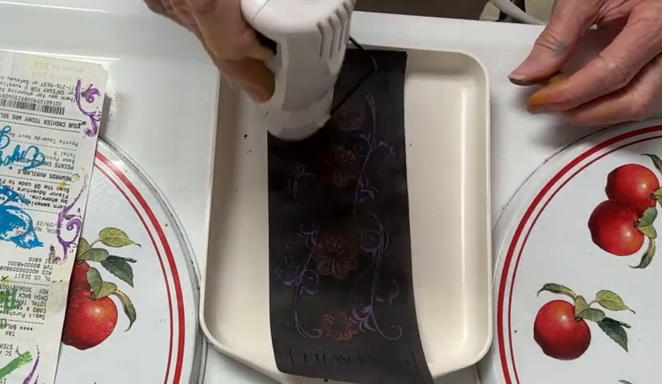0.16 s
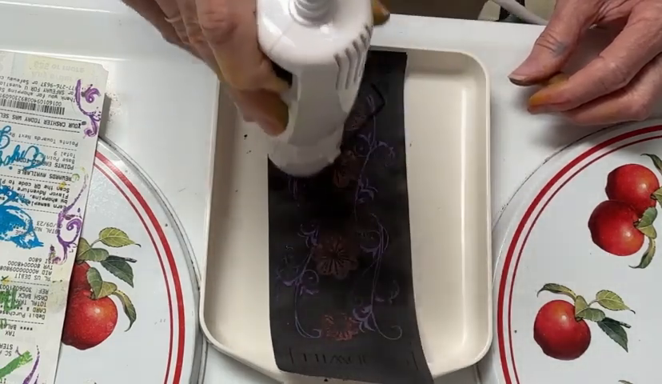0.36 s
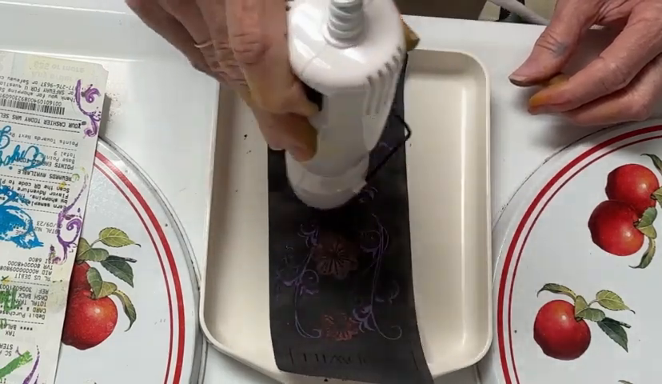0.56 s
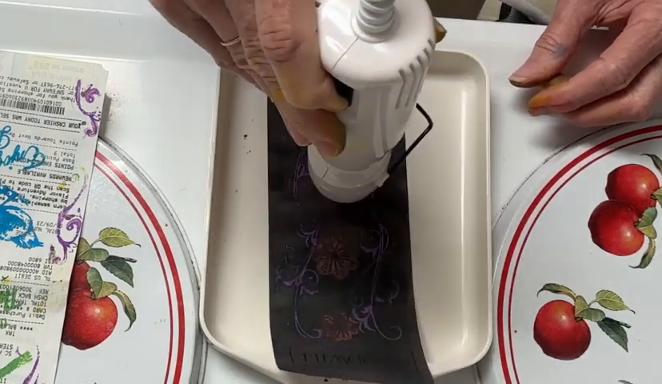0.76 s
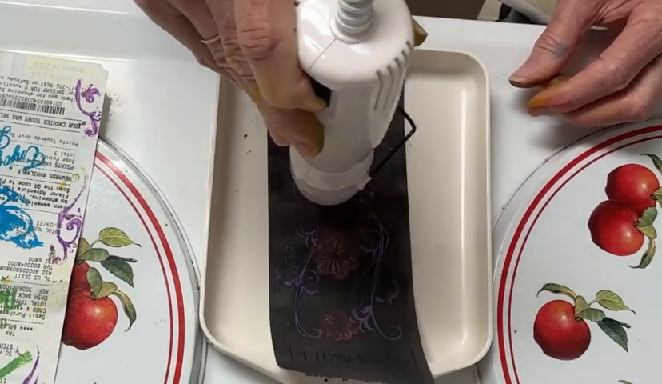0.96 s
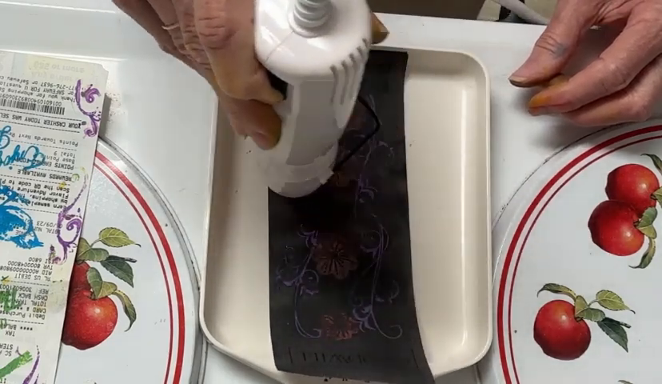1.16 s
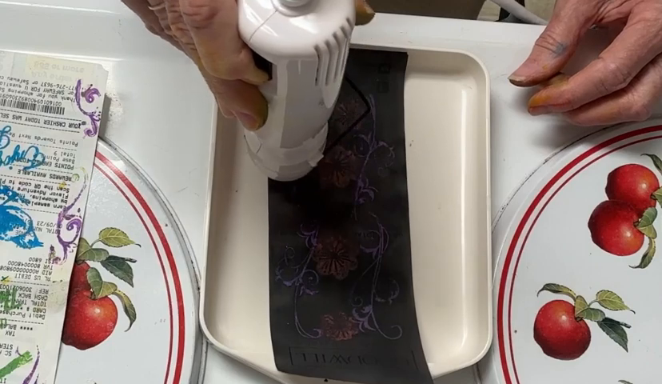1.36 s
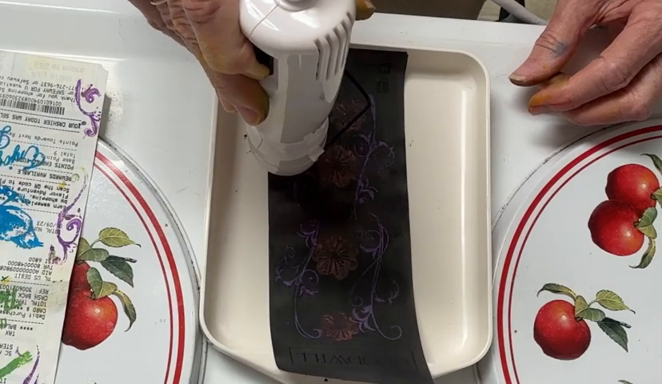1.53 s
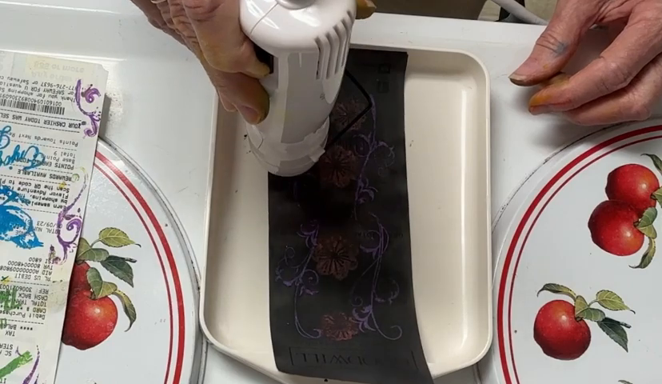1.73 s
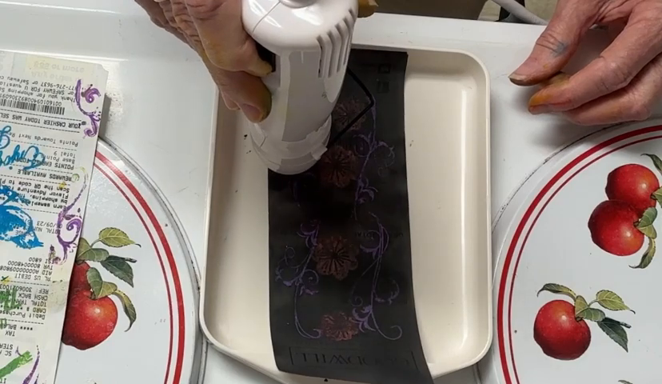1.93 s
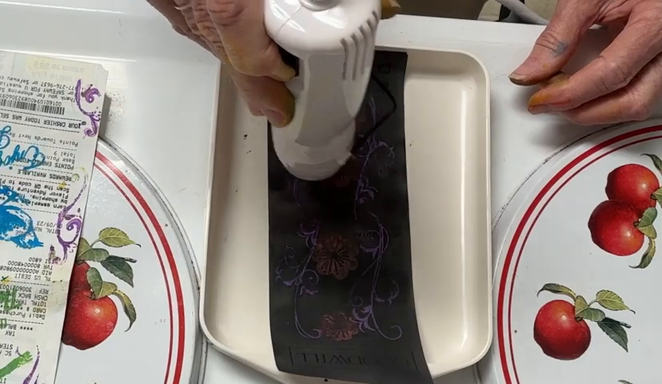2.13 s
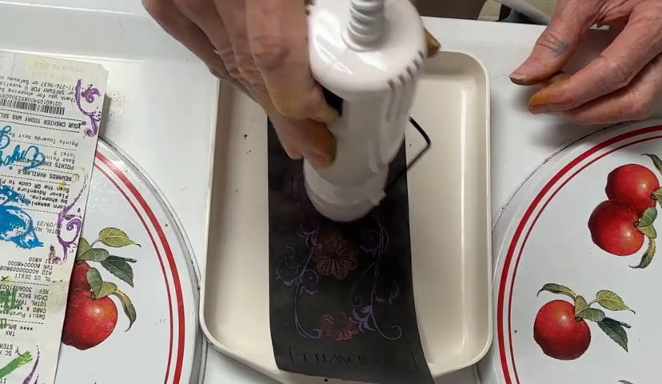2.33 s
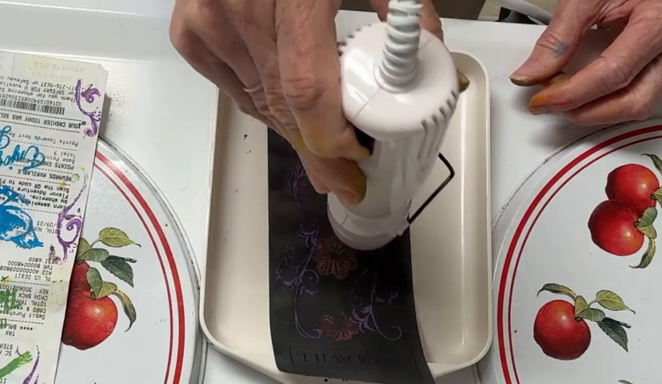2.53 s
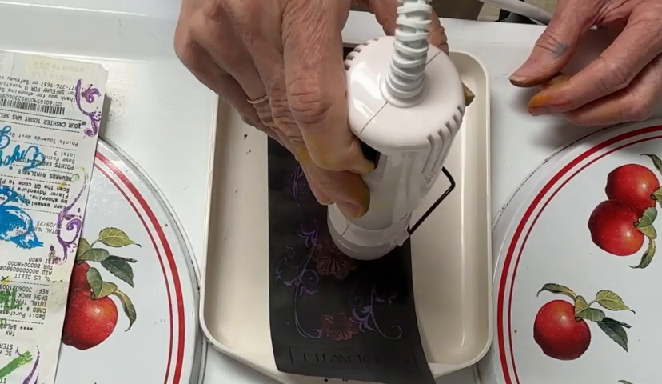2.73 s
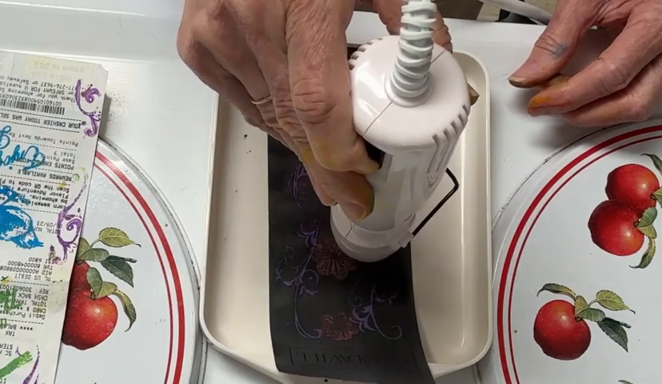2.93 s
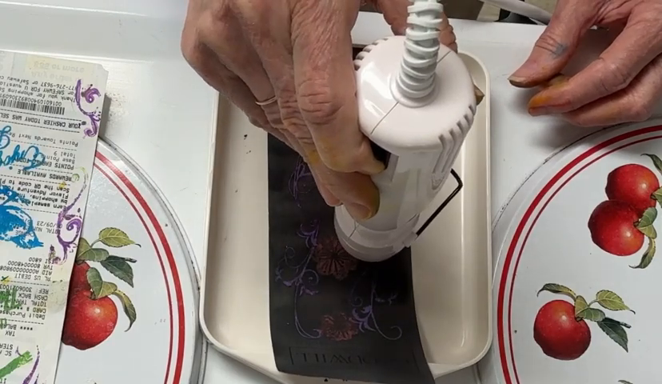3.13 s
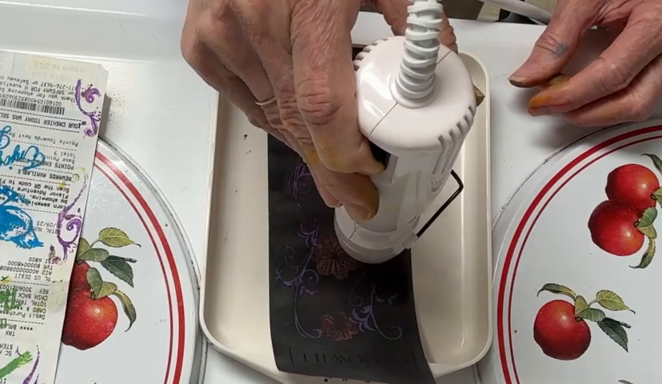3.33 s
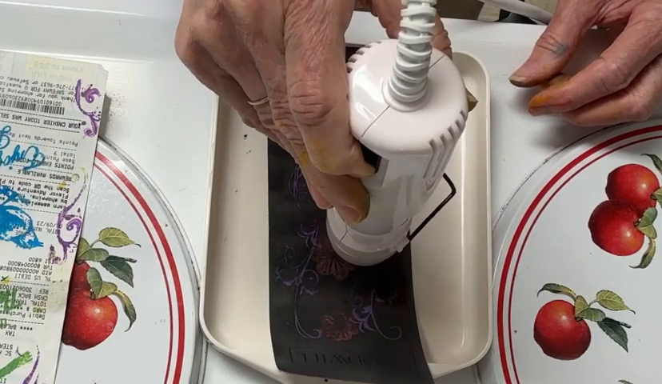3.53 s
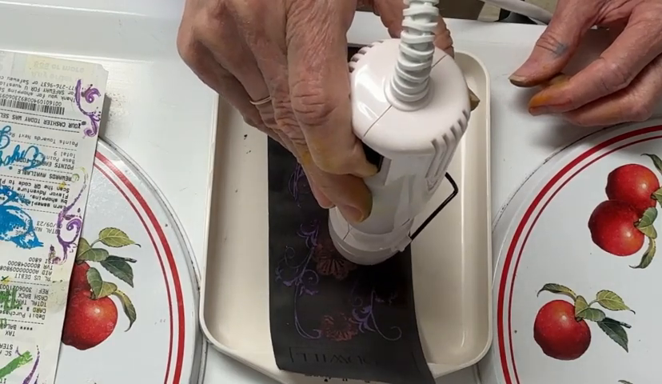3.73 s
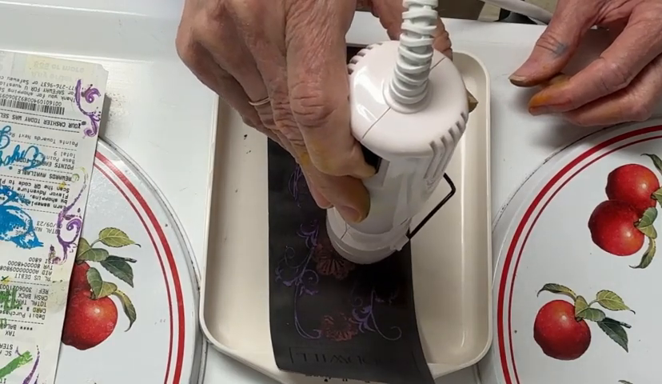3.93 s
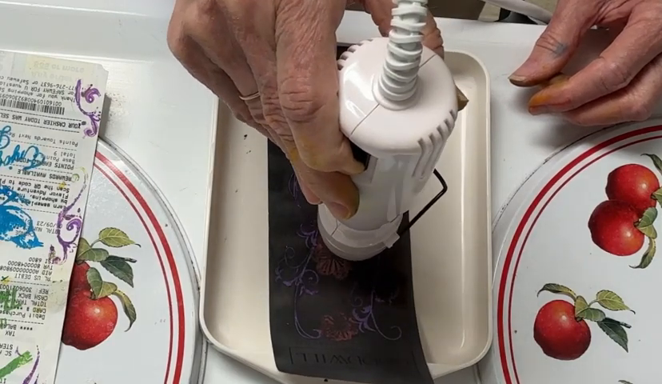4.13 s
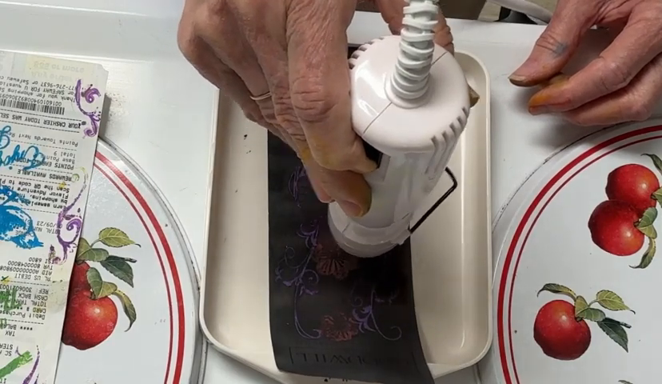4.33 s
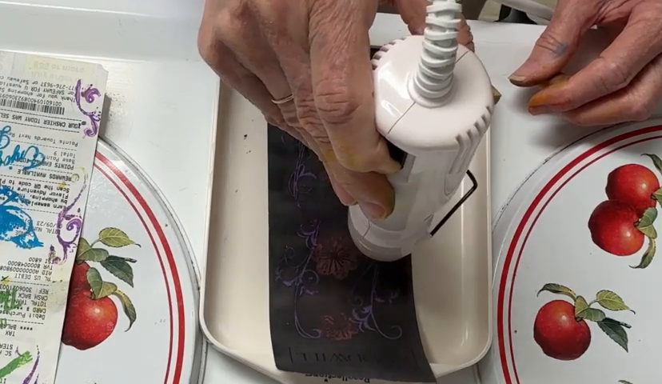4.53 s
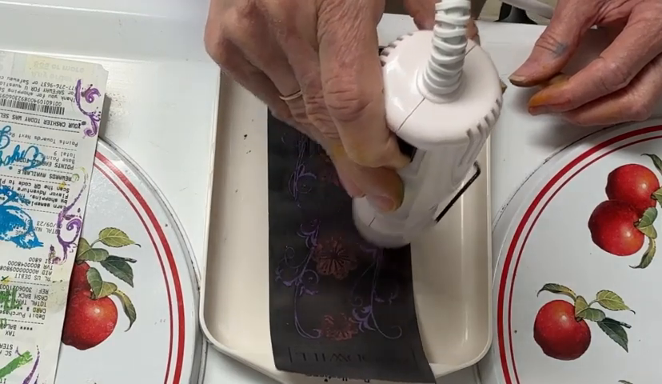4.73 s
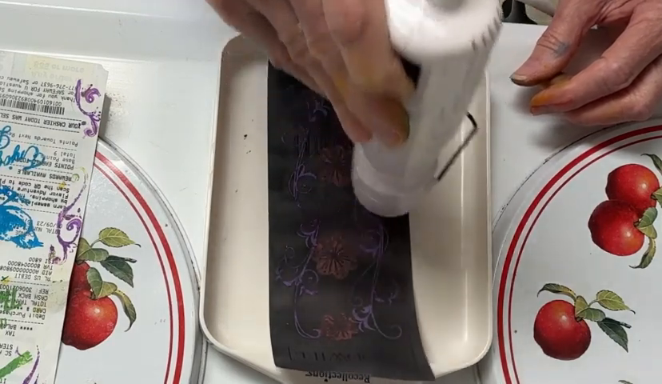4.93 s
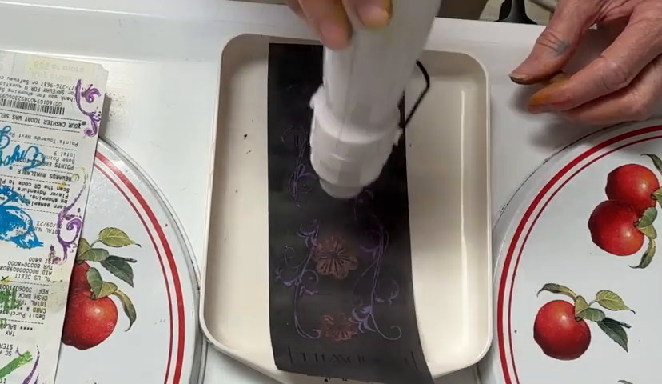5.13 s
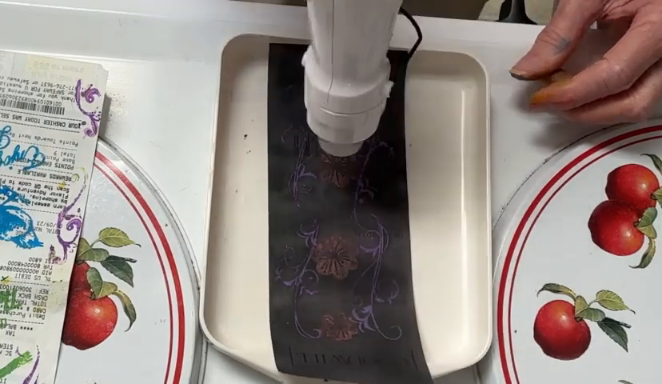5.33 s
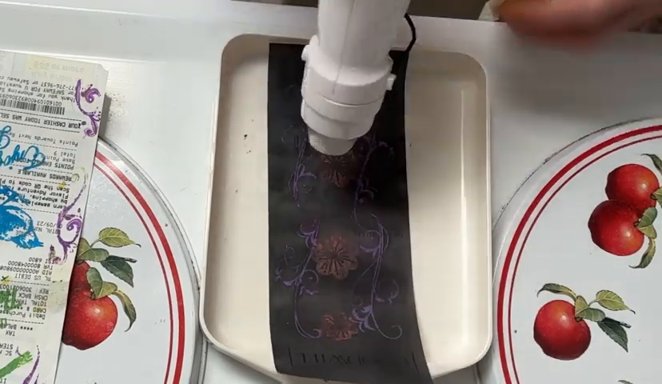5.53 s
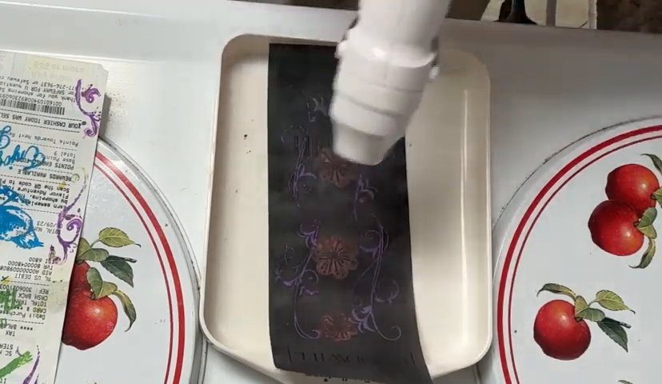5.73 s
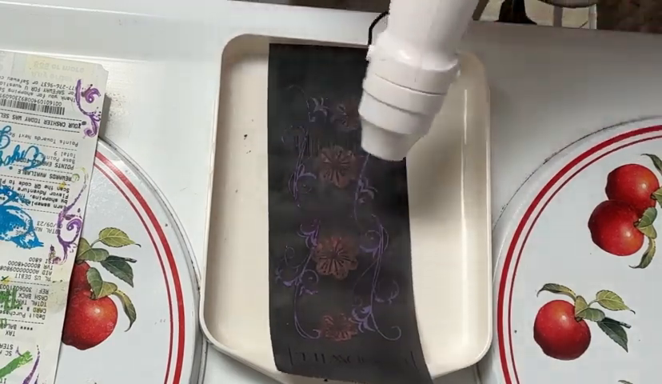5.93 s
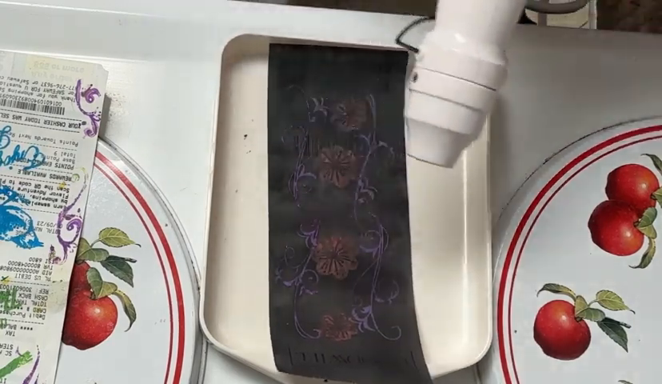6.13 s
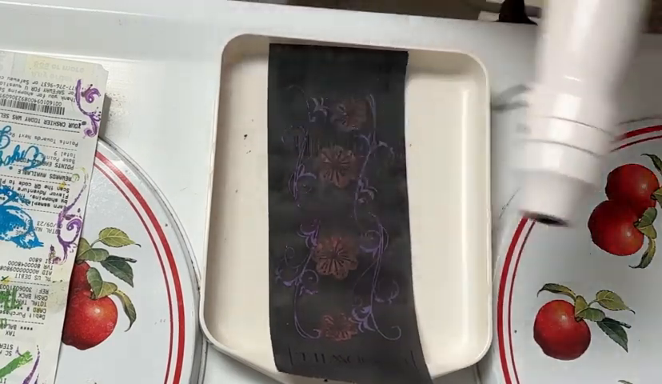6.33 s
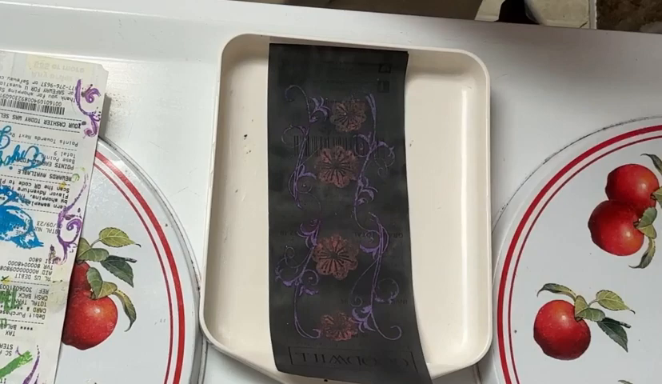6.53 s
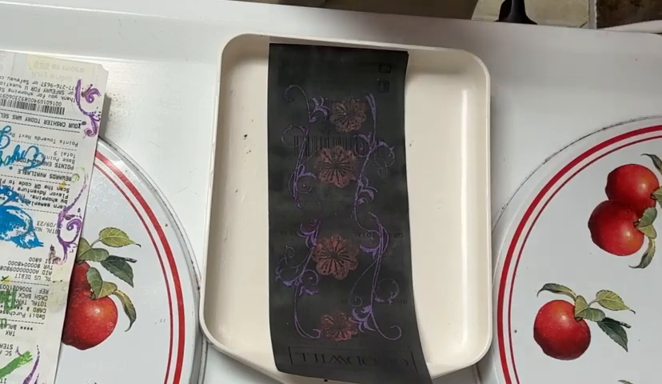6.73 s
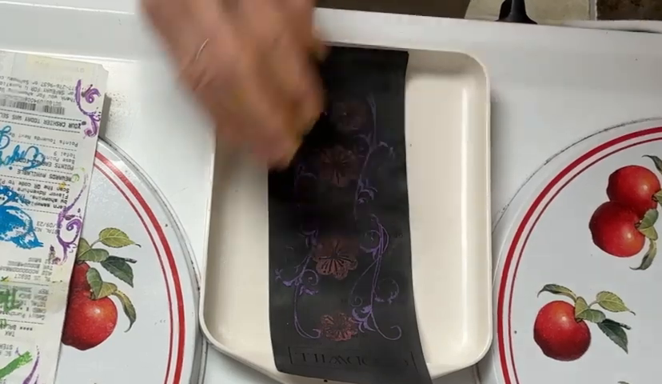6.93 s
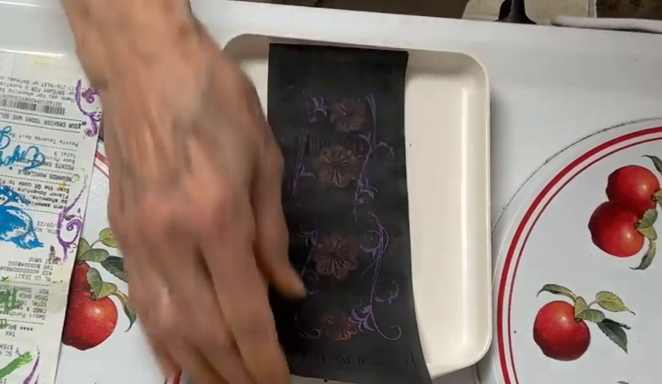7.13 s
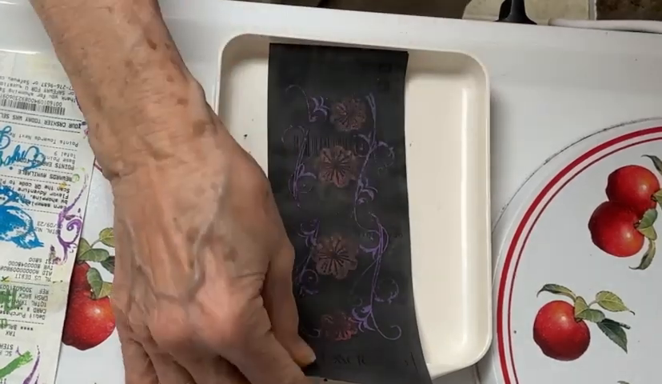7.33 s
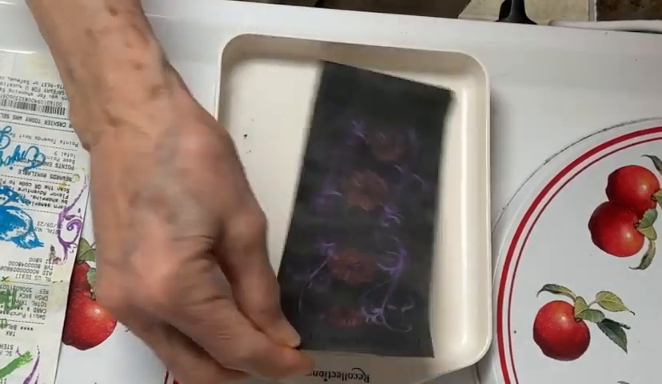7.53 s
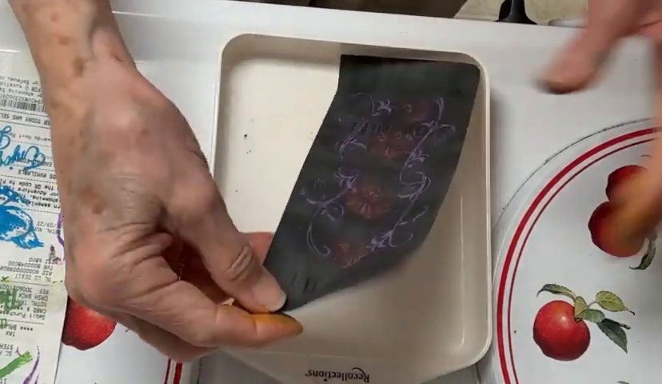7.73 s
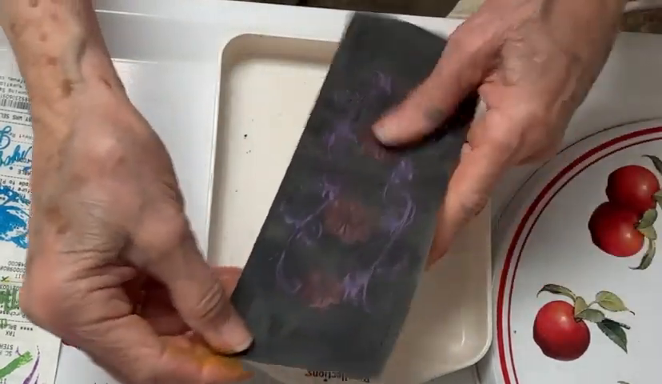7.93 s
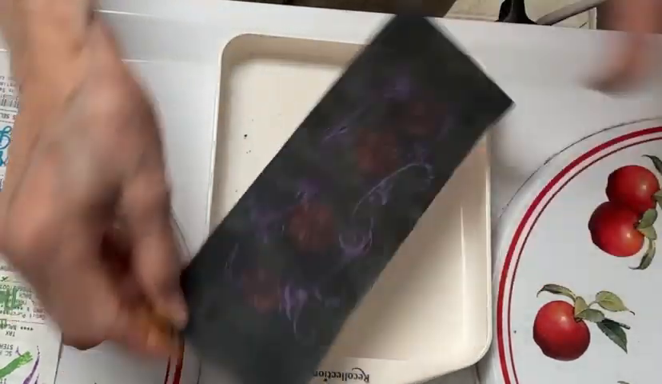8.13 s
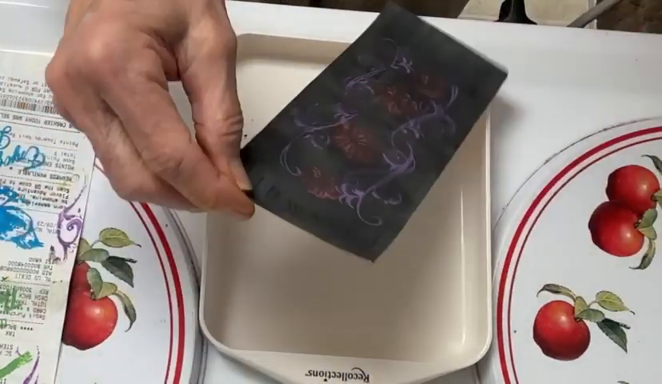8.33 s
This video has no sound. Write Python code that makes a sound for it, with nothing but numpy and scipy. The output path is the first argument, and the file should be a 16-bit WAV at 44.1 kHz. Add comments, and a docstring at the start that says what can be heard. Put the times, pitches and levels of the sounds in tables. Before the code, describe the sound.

Close, constant hot-air hiss and thin motor whine run, then coast down rattling; the tool is set down with knocks and stiff paper is lifted.

```python
"""A small heat gun blows over a strip of paper in a tray, close to the microphone: blade tone and shaft
orders over turbulent hiss coloured by duct resonances, which change as the gun is tipped and lifted.
Switched off, the fan coasts down against air drag while its loose shaft taps the bearing.
Dry ticks (noise snaps) and the wire stand's clink (damped sines) follow; the gun is put down on the
table (modal noise thuds), then paper rubs (noise grains), springs, ticks and is lifted off the ringing tray."""
import sys
import numpy as np
from scipy import signal
from scipy.fft import rfft, irfft
from scipy.io import wavfile
from scipy.ndimage import uniform_filter1d

SR = 44100
rng = np.random.default_rng(int(sys.argv[2]) if len(sys.argv) > 2 else 0)


def digitize_waveform(pressure):
    """Quantize a signal to 16-bit integers and store it at the path in sys.argv[1].

    Rows of a 2-D input are taken as channels; values are limited to [-1, 1].
    """
    field = np.atleast_2d(pressure).T
    bounded = np.clip(field, -1, 1)
    quanta = np.round(bounded * 32767).astype(np.int16)
    wavfile.write(sys.argv[1], SR, quanta)


N = 373968
T = np.arange(N) / SR


def amp(db):
    """Level law: decibels to an amplitude ratio."""
    return 10 ** (np.asarray(db) / 20)


def unit(x):
    """Normalisation: scales to rms 1."""
    return x / np.sqrt(np.mean(abs(x) ** 2) + 1e-20)


def read(points, hz):
    """Spectral interpolation: reads a curve on a log-frequency axis."""
    f, value = np.transpose(points)
    return np.interp(np.log(hz + 1), np.log(f + 1), value)


def bump(hz, centre, width):
    """Resonance: a Gaussian bell of height 1, its width the standard deviation."""
    return np.exp(-.5 * ((hz - centre) / width) ** 2)


def above(hz, corner_hz):
    """Shelving: a weight that goes from 0 to 1 around the corner."""
    return hz ** 2 / (hz ** 2 + corner_hz ** 2)


def placed(events):
    """Superposition: sums (start_s, sound) pairs on one track, cut at its end."""
    track = np.zeros(N)
    for start_s, sound in events:
        part = track[round(start_s * SR):][:len(sound)]
        part += sound[:len(part)]
    return track


def drift(rate_hz):
    """Random modulation: low-passed noise of rms 1, its bandwidth set by the rate."""
    control_rate, count = 400, 4096
    hz = np.fft.rfftfreq(count, 1 / control_rate)
    slow = irfft(rfft(rng.standard_normal(count)) * bump(hz, 0, rate_hz))
    return unit(np.interp(T, np.arange(count) / control_rate, slow))


def coloured(x, db_at):
    """Linear filtering: shapes x by a spectrum in dB, then scales to rms 1."""
    gain = amp(db_at(np.fft.rfftfreq(len(x), 1 / SR)))
    return unit(irfft(rfft(x) * gain, len(x)))


def ring(modes, rise_s=0.00068):
    """Modal decay: a struck object sounds as a sum of damped sines, here for one second."""
    t = np.arange(SR) / SR
    partials = sum(amp(db - 60 * t / t60) * np.sin(2 * np.pi * (hz * t + rng.random()))
                   for hz, db, t60 in modes)
    return partials * (1 - np.exp(-t / rise_s))


def reflected(sound, wet=0.69, t60=0.21, echoes_per_s=2000):
    """Reflection: nearby surfaces throw a ringing sound back, so that its partials beat and swell."""
    t = np.arange(SR // 4) / SR
    arrivals = rng.random(len(t)) < echoes_per_s / SR
    echoes = rng.standard_normal(len(t)) * arrivals * amp(-60 * t / t60)
    returned = signal.oaconvolve(sound, echoes / np.linalg.norm(echoes))[:len(sound)]
    return (sound + wet * returned) / np.hypot(1, wet)


# Spectrum of the background hush, relative: pitch_hz [Hz], level_db [dB]
HUSH_SPECTRUM = [(20, -30), (45, -1.5), (75, 0), (115, -1.5), (165, -12), (280, -16.5), (520, -24.5),
                 (1200, -20.5), (2500, -28), (5000, -31), (10000, -34), (15500, -36)]
HUSH_DB = -60
HUM_HZ, HUM_DB = 74.4, -67


def room():
    """Stationary noise: a low hush, with a hum whose phase wavers."""
    hush = coloured(rng.standard_normal(N), lambda hz: read(HUSH_SPECTRUM, hz))
    hum = unit(np.sin(2 * np.pi * HUM_HZ * T + 0.82 * drift(3)))
    return amp(HUSH_DB) * hush + amp(HUM_DB) * hum


# Spectrum of the rubbing and of the dry ticks, relative: pitch_hz [Hz], level_db [dB]
DRY_SPECTRUM = [(60, -14), (130, -4), (250, -8.5), (450, -9), (900, -1.5), (1700, 0.5), (3200, -1),
                (4200, -3), (5400, -4), (7000, -8), (9500, -10.5), (15500, -23)]
# Strokes of hands and paper over table and tray, before slide's overall gain:
# start_s [s], length_s [s], level_db [dB]
STROKES = [(6.15, .04, -73), (6.55, 0.57, -63), (7.31, .11, -62.5), (7.517, .22, -56), (7.797, 0.27, -49.5),
           (8.168, .14, -46), (8.41, .07, -59.5)]
STROKE_ATTACK_S, STROKE_RELEASE_T60 = 0.029, 0.27  # both in s


def slide(gain_db=-1, grains_per_s=1100, smooth=0.15, catch_db=2, grain_spread_db=3):
    """Stick-slip friction: fibres catch in grains of uneven size as each stroke swells, holds and dies."""
    uneven_db = grain_spread_db * np.minimum(rng.exponential(1, N), 5)
    sizes = rng.choice([-1, 1], N) * amp(uneven_db)
    grains = sizes * (rng.random(N) < grains_per_s / SR) + smooth * rng.standard_normal(N)
    pressure = np.zeros(N)
    for start_s, length_s, level_db in STROKES:
        attack = np.clip((T - start_s) / STROKE_ATTACK_S, 0, 1)
        release_s = np.maximum(T - start_s - length_s, 0)
        pressure += attack * amp(level_db - 60 * release_s / STROKE_RELEASE_T60)
    rubbing = coloured(grains, lambda hz: read(DRY_SPECTRUM, hz))
    return amp(gain_db) * rubbing * pressure * amp(catch_db * drift(31))


# Partials of the stiff paper, before SHEET_DB: pitch_hz [Hz], level_db [dB], t60_s [s]
SHEET_PARTIALS = [(410, 3, 1), (455, -16, .6)]
SHEET_S, SHEET_DB = 7.6655, -57.5


def sheet():
    """Free vibration: the stiff paper hums when it springs."""
    return placed([(SHEET_S, amp(SHEET_DB) * ring(SHEET_PARTIALS))])


def tick(level_db, treble_db, snap_t60=0.034, tail_t60=0.31, tail_db=-14, treble_hz=5000, uneven_db=2.0):
    """Impulsive excitation: a short snap with resonances of its own and a faint tail from the room."""
    t = np.arange(SR // 4) / SR
    knots = np.column_stack([np.geomspace(300, 16000, 40), uneven_db * rng.standard_normal(40)])

    def colour(hz):
        return read(DRY_SPECTRUM, hz) + read(knots, hz) + treble_db * above(hz, treble_hz)
    snap = coloured(rng.standard_normal(len(t)), colour)
    return amp(level_db) * snap * (amp(-60 * t / snap_t60) + amp(tail_db - 60 * t / tail_t60))


# Dry ticks: the gun's shell, the stand's clink, the paper, and the sharp start of a blow on the tray:
# start_s [s], level_db [dB], treble_db [dB]
TICKS = [(5.876, -38, 1), (5.880, -37, 6), (6.373, -55, -28), (6.416, -39, -20), (6.622, -41.5, -14),
         (7.3367, -50.5, -7), (7.491, -47, -10), (7.5482, -46.5, 0), (7.575, -42.5, -5), (7.6656, -35, 1),
         (7.7607, -37.5, 7), (7.7727, -35, -4), (7.8201, -39.5, 4), (7.886, -39, 4), (7.8992, -38, -2),
         (7.915, -36, -7), (7.9708, -42, -8), (8.2334, -29, -16)]


def ticks():
    """Superposition of impulses: every dry tick at its own time."""
    return placed((start_s, tick(*snap)) for start_s, *snap in TICKS)


# Partials of the tray, before TRAY_DB: pitch_hz [Hz], level_db [dB], t60_s [s]
TRAY_PARTIALS = [(569, -3, 1.2), (1180, -0.5, 0.75), (1850, -3, 1.3), (2960, -10, 1.4), (3015, -6, .8)]
TRAY_S, TRAY_DB = 8.2335, -47


def tray():
    """Modal decay: the struck tray sings on."""
    return placed([(TRAY_S, amp(TRAY_DB) * ring(TRAY_PARTIALS))])


# Spectrum of a struck table, relative: pitch_hz [Hz], level_db [dB]
TABLE_SPECTRUM = [(35, -15), (80, -0.5), (140, 3.5), (230, -1), (450, -7.5), (800, -3), (1400, -4.5),
                  (2200, -7.5), (3400, -10), (6000, -13.5), (10000, -18), (15500, -28)]
# Resonances of the table, added to that spectrum: pitch_hz [Hz], width_hz [Hz], level_db [dB]
TABLE_MODES = [(120, 16, 3.5), (150, 21, 4), (223, 16, 2), (376, 23, 10.5), (546, 22, 1.5), (722, 50, 6),
               (910, 42, 1.7), (1070, 30, 0), (1204, 35, 5), (1430, 60, 0), (3370, 120, 0)]
# Damping of the table: pitch_hz [Hz], ring_factor [ratio applied to a contact's t60]
TABLE_DAMPING = [(100, 1.2), (1000, 1.13), (3000, 0.98), (12000, 0.77)]


def knock(level_db, bass_db, treble_db, t60, rise_s, bass_hz=260, treble_hz=2800, bass_lag_s=0.0023):
    """Modal density: a blow rings the table's crowded modes; the bass swells last and dies last."""
    def colour(hz):
        modes_db = sum(db * bump(hz, f, w) for f, w, db in TABLE_MODES)
        tilt_db = bass_db * (1 - above(hz, bass_hz)) + treble_db * above(hz, treble_hz)
        return read(TABLE_SPECTRUM, hz) + modes_db + tilt_db
    body = coloured(rng.standard_normal(SR), colour)
    hz, t, z = signal.stft(body, SR, nperseg=256)
    hz = hz[:, None]
    swell = 1 - (1 - above(hz, bass_hz)) * np.exp(-t / bass_lag_s)
    decay = amp(-60 * t / (t60 * read(TABLE_DAMPING, hz)))
    body = signal.istft(z * swell * decay, SR, nperseg=256)[1][:SR]
    return amp(level_db) * body * (1 - np.exp(-np.arange(SR) / SR / rise_s))


# After the first contact the weight settles: later, deeper, duller, and ringing longer (factor on t60)
SETTLE_S, SETTLE_BASS_DB, SETTLE_TREBLE_DB, SETTLE_RING = .01, 6.5, -14.5, 1.44
RISE_S = .0015  # of a contact with neutral bass


def blow(level_db, bass_db, treble_db, t60, settle_db, heavy=.8):
    """Contact mechanics: a first contact, then the weight settling; heavier contacts rise more slowly."""
    def contact(level_db, bass_db, treble_db, t60):
        return knock(level_db, bass_db, treble_db, t60, RISE_S * amp(heavy * bass_db))
    first = contact(level_db, bass_db, treble_db, t60)
    settling = contact(level_db + settle_db, bass_db + SETTLE_BASS_DB,
                       treble_db + SETTLE_TREBLE_DB, t60 * SETTLE_RING)
    lag = round(SETTLE_S * SR)
    first[lag:] += settling[:len(first) - lag]
    return first


# Blows on the table and tray: start_s [s], level_db [dB], bass_db [dB], treble_db [dB],
# t60_s [s, of the first contact, before damping], settle_db [dB, relative to the first contact]
BLOWS = [(6.4155, -43, -17, -0.5, 0.39, 0), (6.524, -40.5, 3, -13, 0.22, -8),
         (6.674, -41.5, -9, -21, 0.19, -12), (6.7501, -23.5, -5, 3.5, 0.29, -6),
         (6.798, -34, -2, -4, 0.4, -12), (6.862, -36.5, 3, 5, .33, -6), (7.071, -28.5, -3, -5.5, .22, 1.5),
         (8.066, -34.5, -0.5, -23, 0.36, -6.5), (8.165, -36.5, 1.5, 5, .39, 4.5),
         (8.2336, -32, -10, -3, 0.25, -15), (8.333, -46, 1, -2, 0.19, -14)]


def blows():
    """Superposition of impacts: every blow at its own time."""
    return placed((start_s, blow(*hit)) for start_s, *hit in BLOWS)


# Partials of the gun's wire stand, before CLINK_DB: pitch_hz [Hz], level_db [dB], t60_s [s]
STAND_PARTIALS = [(587, -3.5, 0.41), (730, -8, 0.3), (912, -11, .3), (1250, -16, .3), (1685, -10, .35),
                  (1840, -2.5, 0.36), (2260, -4.5, 0.37), (2290, -6, .3), (2560, -13, .3), (2820, -6, .42),
                  (3056, -10, 0.33), (3467, -9, 0.32), (3900, -22, 0.36), (4290, -11.5, 0.53),
                  (4560, -15, 0.36), (5050, -21, .5), (5286, -17, .6), (5650, -20, .45), (6304, -18, .4),
                  (7000, -19, .35), (8350, -22, 0.29), (9400, -26, .35)]
CLINK_S, CLINK_DB = 6.4155, -36.5


def stand_clink():
    """Modal decay with reflections: the struck wire stand rings among nearby surfaces."""
    return placed([(CLINK_S, amp(CLINK_DB) * reflected(ring(STAND_PARTIALS)))])


# The shaft's running speed, how far below it the cold motor starts, and the warm-up time constant
SHAFT_HZ, COLD_SAG_HZ, WARM_UP_S = 274.25, .6, .6
# Switched off, the fan coasts: its speed has halved after COAST_S
OFF_S, COAST_S = 5.525, .37


def shaft_speed():
    """Quadratic drag: turns a second, steady once warm, then falling hyperbolically with time."""
    running = SHAFT_HZ - COLD_SAG_HZ * np.exp(-T / WARM_UP_S)
    return running / (1 + np.maximum(T - OFF_S, 0) / COAST_S)


def slowed():
    """Logarithmic speed scale: how many times the shaft speed has halved."""
    return np.log2(SHAFT_HZ / shaft_speed())


# Partials of the housing, relative: pitch_hz [Hz], level_db [dB], t60_s [s]
HOUSING_PARTIALS = [(1180, -2, 0.099), (1282, 1.5, 0.12), (1384, -3, 0.066)]
# Level, and loss for each halving of the speed
CHATTER_DB, CHATTER_FALL_DB, TAPS_PER_TURN = -41, 21, .42
# The loose shaft shakes hardest while it passes through its critical speed
CRITICAL_HZ, CRITICAL_WIDTH_HZ, CRITICAL_DB = 155, 12, 10


def chatter(jitter=0.065, uneven=0.37, onset_s=0.048):
    """Critical speed: the coasting shaft taps its bearing, and each tap rings the housing."""
    speed = shaft_speed()
    resonance_db = CRITICAL_DB * bump(speed, CRITICAL_HZ, CRITICAL_WIDTH_HZ)
    level_db = CHATTER_DB - CHATTER_FALL_DB * slowed() + resonance_db
    tap_rate = TAPS_PER_TURN * speed * (1 + jitter * drift(40.2))
    tap_count = np.floor(np.cumsum(tap_rate) / SR)
    taps = np.diff(tap_count, prepend=0) * (1 + uneven * drift(60))
    rattle = unit(signal.oaconvolve(taps, ring(HOUSING_PARTIALS))[:N])
    return rattle * amp(level_db) * np.clip((T - OFF_S) / onset_s, 0, 1)


# How the gun is held: time_s [s], upright [0 slanted to 1 upright]
POSE = [(0, .03), (2.1, 0), (2.5, .85), (3.5, 0.91), (4.7, 0.86), (5.15, .22)]


def upright(t):
    """Kinematics: how upright the gun stands at the times t."""
    return np.interp(t, *np.transpose(POSE))


# Turbulence spectrum, relative: pitch_hz [Hz], level_db [dB]
AIR_SPECTRUM = [(30, -30), (50, -15), (90, -23), (122, -1), (175, -12.5), (250, -13), (500, -12.5),
                (1000, 0), (2000, -0.56), (3500, -7), (6000, -7.5), (10000, -12), (15500, -16.5)]
# Resonances of barrel, vents and tray, at full drive: pitch_hz [Hz], width_hz [Hz], level_db [dB],
# upright_change_db [dB, when the gun stands upright]
DUCTS = [(385.2, 44, 15, 1), (551.4, 32, 16, 0), (686, 50.3, 15.5, 1.1), (851.6, 35, 15.5, -3),
         (949, 26, 8, -0.7), (1184, 34, 8.5, 0.4), (1500, 13, 6, 3), (1748, 110, 5.6, -0.5),
         (2007, 29, 8, 0), (2126, 30.5, 12, -2.5), (2253, 62, 12.5, -2.5), (2546, 69, 4.5, 2.9),
         (2910, 99, 7.5, 4), (3159, 52, 12.5, -1), (3306, 49, 6, 3), (3784, 56, 2, 5), (4440, 160, 7.5, -5),
         (5007, 144, 5.5, 4), (5450, 73, 3, 3), (6330, 89, 1.5, 0.5), (7860, 650, 3, -1.5),
         (10577, 540, 4, -5)]
# Colour gained when the nozzle is lifted clear of the tray: pitch_hz [Hz], width_hz [Hz], level_db [dB]
FREE_NOZZLE = [(1250, 140, 2.5), (2170, 150, 0), (2920, 510, -4), (4400, 200, -4), (5060, 260, 3),
               (13750, 150, 5)]
LIFT_S, LIFT_TAKES_S = 4.98, 0.33
# Level at full speed, and loss for each halving of the speed
RUSH_DB, RUSH_FALL_DB = -32.5, 24.5


def rush(patchy_db=0.45, echo_db=2.0, flutter_db=0.25, bright_hz=4000, slant_dull_db=0.4, duct_fade=0.29):
    """Duct resonance: turbulent air rings cavities whose weights shift as the gun is tipped."""
    hz, t, z = signal.stft(rng.standard_normal(N), SR, nperseg=2048, noverlap=1536)
    hz = hz[:, None]
    tipped_up = upright(t)
    lifted = np.clip((t - LIFT_S) / LIFT_TAKES_S, 0, 1)
    driven = np.exp(-duct_fade * np.interp(t, T, slowed()))  # slow air rings the barrel less
    ducts = sum(bump(hz, f, w) * (db + change_db * tipped_up) for f, w, db, change_db in DUCTS)
    nozzle = sum(db * bump(hz, f, w) for f, w, db in FREE_NOZZLE)
    slant = slant_dull_db * (1 - tipped_up) * above(hz, bright_hz)

    def patches(bins, frames):
        across_pitch = uniform_filter1d(rng.standard_normal(z.shape), size=bins, axis=0)
        return unit(uniform_filter1d(across_pitch, size=frames, axis=1))
    eddies = patches(16, 6)
    # reflections cut a fine comb into the hiss, which creeps as the hand moves
    comb = patches(3, 70)
    field = read(AIR_SPECTRUM, hz) - slant + driven * ducts + lifted * nozzle
    field = field + patchy_db * eddies + echo_db * comb * above(hz, 1160)
    air = signal.istft(z * amp(field), SR, nperseg=2048, noverlap=1536)[1][:N]
    level_db = RUSH_DB - RUSH_FALL_DB * slowed()
    return air / np.std(air[T < OFF_S]) * amp(level_db + flutter_db * drift(20))


# Strong multiples of the shaft speed, at full speed: order [multiple], level_db [dB rms],
# upright_change_db [dB, when the gun stands upright]
FAN_ORDERS = [(5, -52, -1.5), (6, -49, 4.5), (7, -40, -1.5), (8, -45, -6.5), (10, -51.5, -4), (13, -71, 14),
              (14, -56, -2), (15, -62, 4), (16, -68, 2), (17, -60, -2.5), (18, -62, -5), (20, -55, 0.5),
              (21, -50, 0), (23, -56, -10), (29, -61.5, 5), (30, -58, -8), (31, -64, 4), (32, -59, -1),
              (34, -64.5, 5), (35, -56, 1.5), (38, -59, 3), (39, -59, 4.5), (41, -62, -3), (46, -56, -8),
              (50, -61, -5), (51, -58, 6), (52, -59, 1), (56, -60, 1)]
BLADES, WEAK_ORDER_DB = 7, -65.5  # the level of each order that the table leaves out
WHINE_FALL_DB = 35  # loss for each halving of the speed


def whine(shake=0.0089, fade=0.57, flicker=0.18, coast_db=40, wander_hz=.1):
    """Blade-passing tone: multiples of shaft speed; table echoes make the high ones come and go."""
    speed = shaft_speed() + wander_hz * drift(1)
    level_db = -WHINE_FALL_DB * slowed()
    tipped_up = upright(T)
    angle = 2 * np.pi * np.cumsum(speed) / SR + shake * drift(25)
    strong = {round(order): (db, change_db) for order, db, change_db in FAN_ORDERS}
    unpowered = amp(-coast_db * (1 - speed / speed.max()))  # the motor's buzz dies before the blade tone
    tones = np.zeros(N)
    for order in range(2, 58):
        db, change_db = strong.get(order, (WEAK_ORDER_DB, 0))
        depth = fade * above(order * SHAFT_HZ, 3700)
        swell = (1 + depth * drift(0.84)) / np.hypot(1, depth)
        phase = order * angle + depth * drift(1.9) + 2 * np.pi * rng.random()
        line = (1 + flicker * drift(11)) * np.cos(phase)
        power = 1 if order == BLADES else unpowered
        tones += amp(db + change_db * tipped_up) * swell * line * power
    return np.sqrt(2) * tones * amp(level_db)  # sqrt(2) turns rms levels into peaks


def scene():
    """Superposition: all sources reach one microphone, the same in both channels."""
    handling = slide() + sheet() + ticks() + tray() + blows() + stand_clink()
    heat_gun = chatter() + rush() + whine()
    mix = room() + handling + heat_gun
    return np.array([mix, mix])


def record(dry):
    """Band limiting: a steep linear-phase low-pass at 15780 Hz."""
    low_pass = signal.firwin(1023, 15780, window=("kaiser", 9), fs=SR)
    return signal.oaconvolve(dry, low_pass[None], "same")


dry = scene()
out = record(dry)
digitize_waveform(out)
```